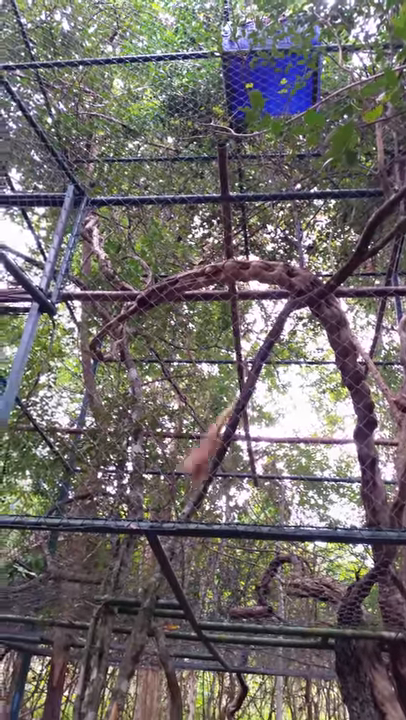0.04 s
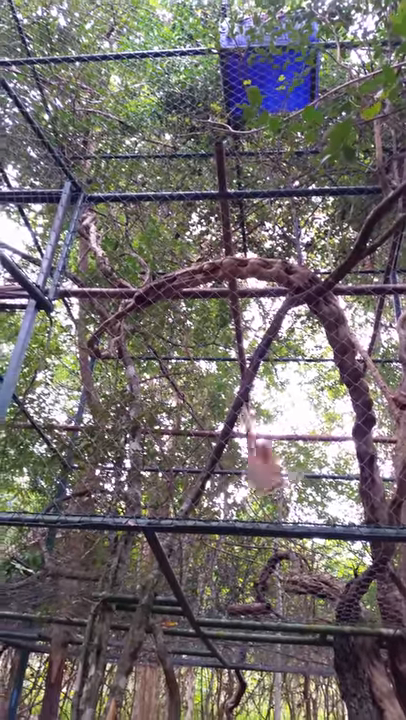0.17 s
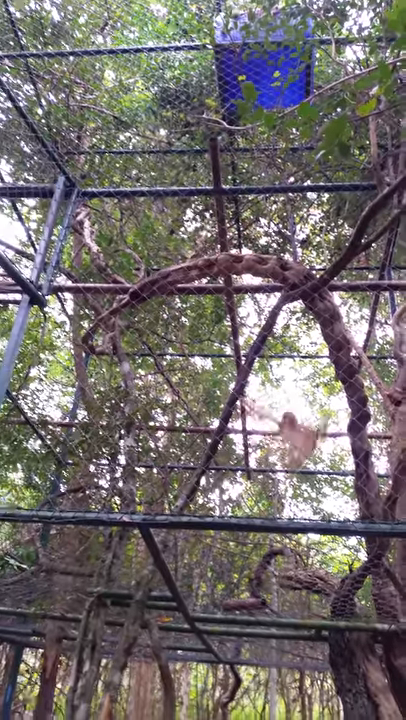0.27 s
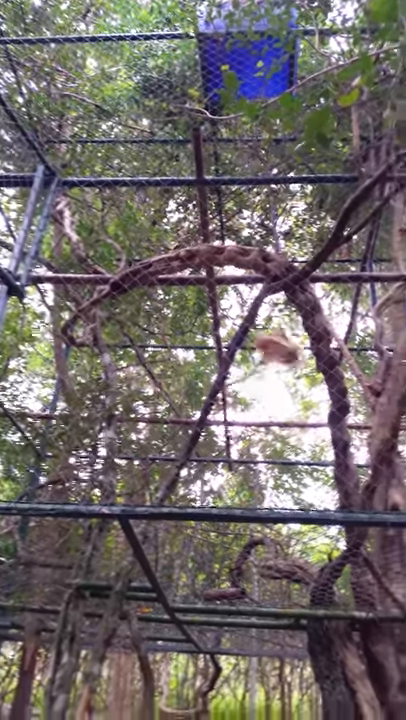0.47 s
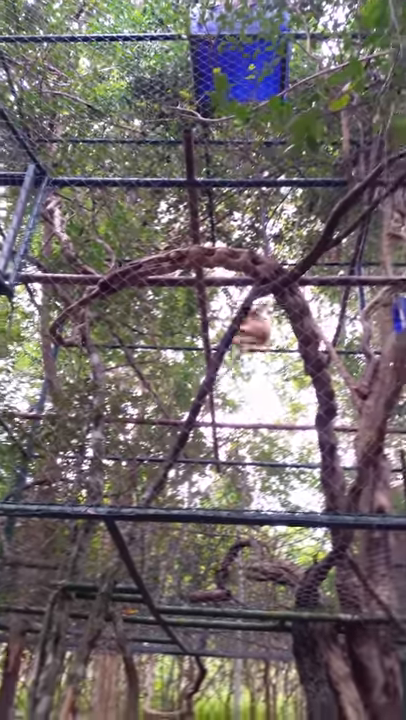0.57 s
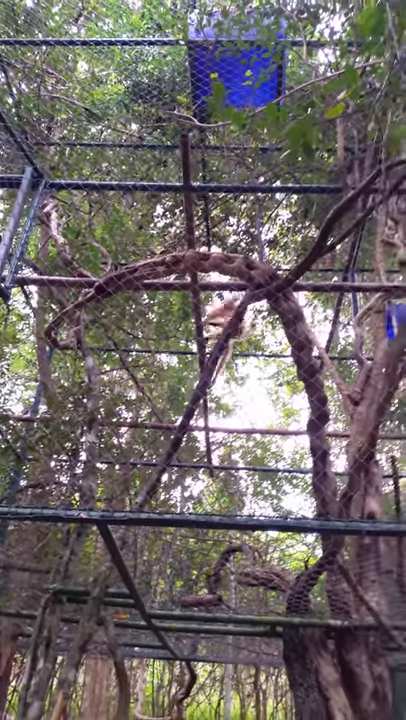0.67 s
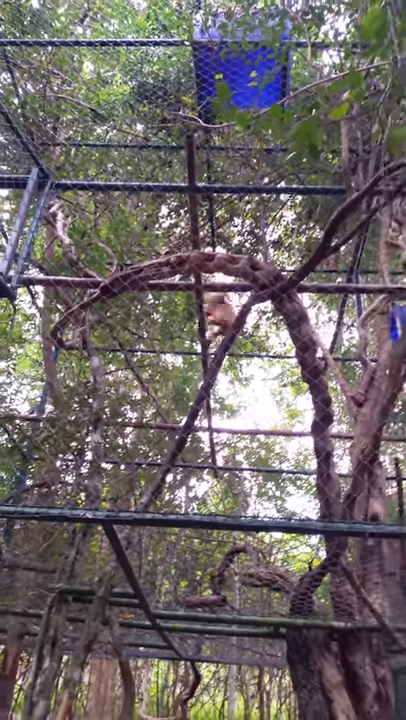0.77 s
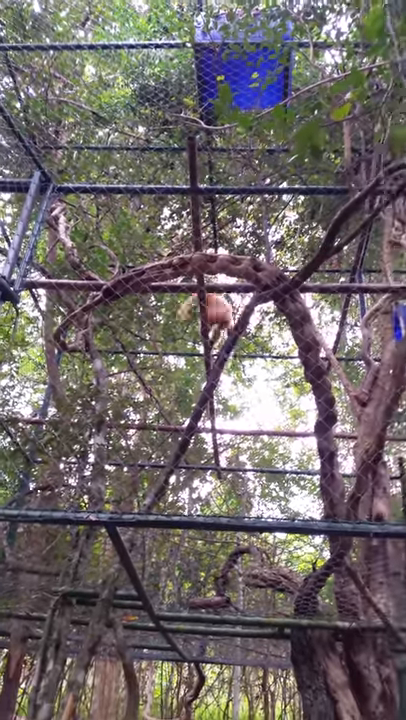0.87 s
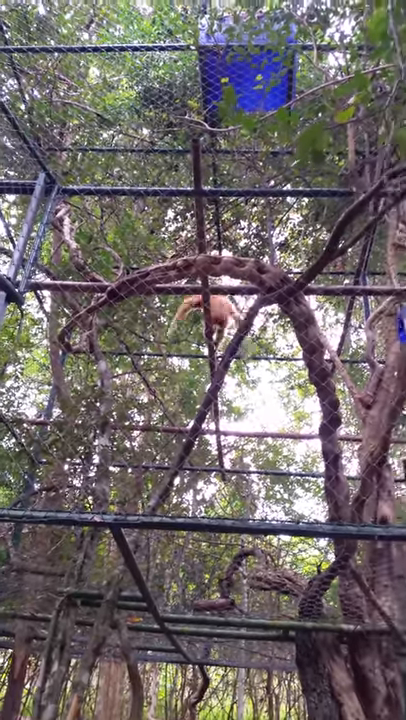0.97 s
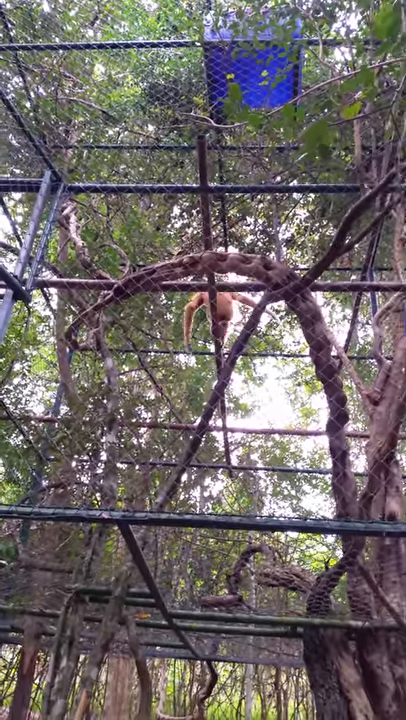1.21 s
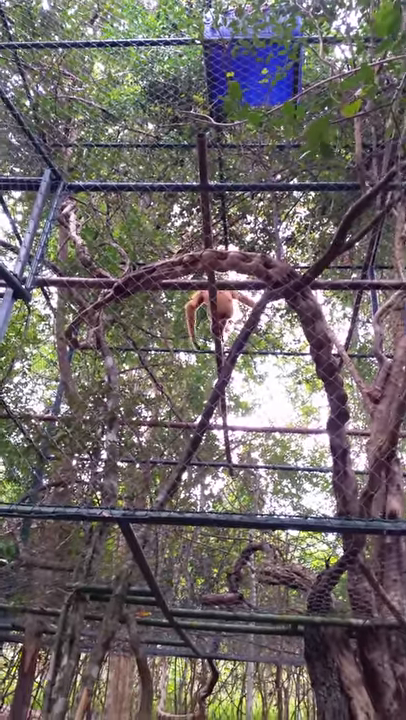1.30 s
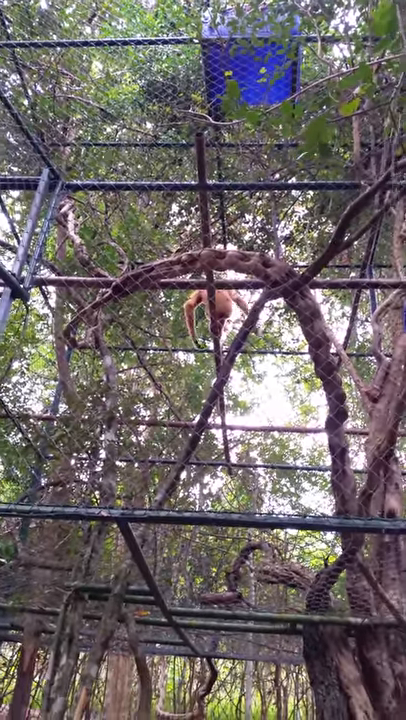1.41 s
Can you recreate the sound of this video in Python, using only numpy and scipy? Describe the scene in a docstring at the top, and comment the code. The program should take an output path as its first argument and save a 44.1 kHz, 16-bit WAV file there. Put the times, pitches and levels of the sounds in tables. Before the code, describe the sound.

A gibbon whoops in a large outdoor cage, heard from the right. The echo of an earlier call fades, then three loud whoops come at about 0.2, 0.6 and 1.1 seconds, each sweeping steeply up and breaking into a thin squeak. Soft falling grunts sound near 0.35 and 0.65 seconds. Faint branch rustling, brief hisses and dull bumps fall in between, over a low distant rumble.

```python
"""A gibbon swings through a large outdoor cage. An earlier whoop dies away over a distant rumble.
At 0.18 s the first whoop, a nearly pure tone, sweeps up two octaves and breaks into a thin squeak;
a soft falling grunt and rustling branches lie underneath. The second whoop follows at 0.63 s with
another grunt, the third at 1.06 s. Brief hisses and dull bumps fall in between.
Near surfaces and the enclosure throw the calls back."""
import sys
import numpy as np
from scipy import signal
from scipy.fft import rfft, irfft
from scipy.io import wavfile
from scipy.ndimage import uniform_filter1d, minimum_filter1d

SR = 44100
rng = np.random.default_rng(int(sys.argv[2]) if len(sys.argv) > 2 else 0)


def materialize(psi):
    """Save the field psi as 16-bit PCM at rate SR to the path in sys.argv[1].

    A 1-D psi becomes a single channel; in a 2-D psi each row is a channel.
    """
    bounded = np.clip(np.atleast_2d(psi).T, -1, 1)
    quanta = np.round(bounded * 32767).astype(np.int16)
    wavfile.write(sys.argv[1], SR, quanta)


N = 63945
LEAD = SR // 2  # samples before time zero
BAND_LIMIT_HZ = 14750


def amp(db):
    """Decibels to gain."""
    return 10 ** (np.asarray(db) / 20)


def unit(x):
    """Scales to rms 1."""
    return x / np.sqrt(np.mean(x ** 2) + 1e-20)


def read(points, hz):
    """Interpolates a table on a log-frequency axis."""
    points_hz, value = np.transpose(points)
    return np.interp(np.log(hz + 1), np.log(points_hz + 1), value)


def add(mix, start_s, sound):
    """Mixes a sound in at start_s."""
    part = mix[LEAD + round(start_s * SR):][:len(sound)]
    part += sound[:len(part)]


def noise(size, gain):
    """Unit-rms noise shaped by the function gain(Hz)."""
    spectrum = rfft(rng.standard_normal(size)) * gain(np.fft.rfftfreq(size, 1 / SR))
    return unit(irfft(spectrum, size))


def coloured(size, points):
    """Unit-rms noise from a table. Each row: frequency in Hz, relative level in dB."""
    return noise(size, lambda f: amp(read(points, f)))


def waver(size, rate_hz):
    """Random unsteadiness around a rate."""
    return noise(size, lambda f: f / rate_hz / (1 + (f / rate_hz) ** 3))


def arch(length_s):
    """Half-sine swell and fade."""
    return np.sin(np.linspace(0, np.pi, max(round(length_s * SR), 64)))


def follow(curve, attack_s=0.0022, release_s=0.0035):
    """A curve's soft-edged gate, then its value columns, per sample."""
    times, *columns = np.transpose(curve)
    times = np.sort(times)
    t = times[0] + np.arange(max(int((times[-1] - times[0]) * SR), 64)) / SR
    gate = np.clip((t - t[0]) / attack_s, 0, 1) * np.clip((t[-1] - t) / release_s, 0, 1)
    return [np.sin(gate * np.pi / 2) ** 2] + [np.interp(t, times, c) for c in columns]


def phase_of(hz):
    """Running phase of a pitch curve."""
    return 2 * np.pi * np.cumsum(hz) / SR


def background(level_db=-54, side_gain=0.22):
    """Low distant rumble, nearly the same on both sides."""
    # Outdoor spectrum. Each row: frequency in Hz, relative level in dB.
    spectrum = [(20, -13), (40, -15), (65, 0.5), (90, -5), (130, -9.5), (220, -22), (450, -29.5),
                (1500, -14.5), (4000, -21.5), (6300, -32.5), (8000, -79), (14000, -64)]
    mid = coloured(N, spectrum)
    side = side_gain * coloured(N, spectrum)
    return amp(level_db) * np.array([mid + side, mid - side])


def rustle(length_s, db):
    """A dull swell of swaying branches."""
    # Branch noise. Each row: frequency in Hz, relative level in dB.
    spectrum = [(60, -25), (160, -1), (260, -2.5), (450, -1.5), (700, 0.5), (1500, -49), (5000, -35),
                (14000, -38)]
    swell = arch(length_s)
    return amp(db) * swell * coloured(len(swell), spectrum)


def bump(length_s, hz, db):
    """A soft, dull knock: one swell of a low sine."""
    swell = arch(length_s)
    return amp(db) * swell * np.sin(phase_of(np.full(len(swell), hz)))


def hiss(length_s, centre_hz, width_hz, db):
    """A brief band of noise in the high treble."""
    swell = arch(length_s)
    band = noise(len(swell), lambda f: 1 / (1 + (2 * (f - centre_hz) / width_hz) ** 2))
    return amp(db) * swell * band


def grunt(length_s, start_hz, end_hz, db, jitter=0.06):
    """A soft, slightly rough falling tone."""
    swell = arch(length_s)
    hz = np.geomspace(start_hz, end_hz, len(swell)) * (1 + jitter * waver(len(swell), rate_hz=150))
    return amp(db) * swell * np.sin(phase_of(hz))


def squeak(curve, jitter=0.019, blur_hz=1300):
    """The voice breaks into a thin whistle, partly blurred into noise."""
    gate, hz, db, rough = follow(curve)
    rough = np.clip(rough, 0, 1)
    phase = phase_of(hz * (1 + jitter * waver(len(hz), rate_hz=700)))
    soft_db = 0.6 * np.minimum(db + 24, 0)  # overtones recede below -24 dB
    tone = 0
    for k, level_db in enumerate([0, -19 + soft_db, -35.5 + soft_db], 1):
        blur = noise(len(hz), lambda f: 1 / (1 + (f / blur_hz) ** 4))
        partial = np.sqrt(1 - rough ** 2) * np.sin(k * phase) + rough * blur * np.cos(k * phase)
        tone += amp(level_db) * (k * hz < BAND_LIMIT_HZ) * partial
    return gate * amp(db) * tone


def whoop(curve, air_db, blur_rad, jitter=0.005, fade_in_s=0.0061):
    """A rising tone whose blurred overtones sweep through the throat resonances, with a little air."""
    # Throat and open mouth. Each row: frequency in Hz, gain in dB.
    throat = [(550, 1), (900, 1.5), (1400, 3), (1900, 4.5), (2300, 6.5), (2800, -2), (3700, -8), (4700, -2),
              (5600, -2.5), (6600, -8), (7800, -17.5), (10000, -19), (12200, -28.5), (14500, -34)]
    # Air noise in the voice. Each row: frequency in Hz, relative level in dB.
    breath = [(450, -48.5), (900, -14), (2200, -19), (4500, 14), (6300, -4.5), (8000, -20), (11000, -23),
              (12500, -9), (14500, -19)]
    # Brief level dips. Each row: time in seconds, half width in seconds, depth in dB.
    dips = [(0.219, 0.0027, -0.5), (.281, 0.002, -8), (0.312, 0.0034, -21), (0.672, 0.0028, -10.5),
            (.699, 0.0037, -12), (0.722, 0.0012, -22), (0.735, 0.005, -8), (1.1, 0.0045, -10),
            (1.128, 0.0073, -5), (1.157, 0.0032, -8)]
    gate, hz, db, second_db, higher_db = follow(curve)
    size = len(hz)
    t = curve[0][0] + np.arange(size) / SR
    flutter_db = hz / 1900 * waver(size, rate_hz=102)  # grows with pitch: 1 dB rms at 1900 Hz
    dip_db = sum(depth_db * np.exp(-((t - at_s) / width_s) ** 2) for at_s, width_s, depth_db in dips)
    phase = phase_of(hz * (1 + jitter * waver(size, rate_hz=296)))
    slope_db = -1 + 0.85 * higher_db  # per harmonic; softer overtones fall off faster
    harmonics_db = [0, second_db, higher_db - 10]
    harmonics_db += [higher_db + slope_db * (k - 3.83) for k in range(4, 10)]
    tone = 0
    for k, level_db in enumerate(harmonics_db, 1):
        blur = blur_rad * (k - 1) * waver(size, rate_hz=666)
        gain = amp(read(throat, k * hz) + level_db) * (k * hz < BAND_LIMIT_HZ)
        tone += gain * np.sin(k * phase + blur)
    air = amp(air_db + 0.2 * higher_db) * coloured(size, breath)
    gate = gate * np.minimum((t - t[0]) / fade_in_s, 1)
    return gate * amp(db + flutter_db + dip_db) * (tone + air)


def diffuse_tail(early_db=11.5, early_s=0.073, build_s=0.0063):
    """Stereo reverberation of the cage; nearby bars and foliage scatter more at first."""
    # Decay. Each row: frequency in Hz, T60 in seconds.
    t60 = [(300, .5), (1000, 1.17), (2000, 0.84), (4500, 0.68), (8000, .5), (14000, 0.65)]
    # Tail spectrum. Each row: frequency in Hz, gain in dB.
    colour = [(250, -15), (650, -31), (900, -1.5), (1400, 0.5), (2100, 2), (3000, 2.5), (5000, 6),
              (8000, 10.5), (14000, 13)]
    # Left-right likeness. Each row: frequency in Hz, correlation from 0 to 1.
    likeness = [(700, 0.58), (1500, 0.2), (3000, 0.12), (8000, 0.075)]
    hz, t, (apart, right) = signal.stft(rng.standard_normal((2, SR)), SR, nperseg=256)
    hz = hz[:, None]
    same = np.clip(read(likeness, hz), 0, 1)
    left = same * right + np.sqrt(1 - same ** 2) * apart
    decay = amp(-60 * t / read(t60, hz) + early_db * np.exp(-t / early_s))
    decay /= np.sqrt((decay ** 2).mean(1, keepdims=True) * SR)  # equal energy per band
    tail = signal.istft(np.array([left, right]) * decay * amp(read(colour, hz)), SR, nperseg=256)[1]
    return tail * np.minimum(np.arange(tail.shape[1]) / SR / build_s, 1) ** 2


def enclosure(calls, direct_db=(-14.5, 0.5), tail_db=(-18, -7)):
    """Direct sound from the right, near echoes that beat against the sweeps, and a diffuse tail."""
    # Near surfaces. Each row: delay in ms, left gain, right gain.
    echoes = [(2.686, 0.06, .16), (6.183, -0.19, 0.42), (10.4, 0.044, 0.27), (16.42, 0.038, -0.14),
              (27.12, -0.054, 0.061)]
    # Extra colour on the left. Each row: frequency in Hz, gain in dB.
    left_colour = [(300, 4), (800, 4), (1200, 3.5), (2000, -3), (3000, -3), (4500, -0.5), (8000, -11),
                   (12000, 15.5)]
    response = diffuse_tail() * amp(tail_db)[:, None]
    response[:, 0] += amp(direct_db)
    for delay_ms, *gains in echoes:
        response[:, round(delay_ms * SR / 1000)] += gains
    left, right = signal.fftconvolve(calls[None], response, axes=1)[:, :2 * SR]
    hz = np.fft.rfftfreq(len(left), 1 / SR)
    left = irfft(rfft(left) * amp(read(left_colour, hz)), len(left))
    return np.array([left, right])[:, LEAD:LEAD + N]


def scene(earlier_s=0.44, low_cut_hz=491, low_left_db=-3.5):
    """Calls and hisses in the enclosure; soft low sounds dry, near the centre."""
    # Swaying branches. Each row: start in seconds, length in seconds, level in dB.
    rustles = [(.375, 0.071, -44.5), (0.428, 0.12, -51), (0.511, 0.053, -50), (0.679, 0.11, -55),
               (0, 0.43, -60.5), (1.056, 0.23, -90)]
    # Dull knocks. Each row: start and length in seconds, pitch in Hz, level in dB.
    bumps = [(.385, 0.033, 444, -44.5), (.925, 0.036, 196, -58), (1.275, 0.039, 169.8, -54)]
    # High hisses; the narrow band near 13.45 kHz rides on the third overtone of a squeak. Each row: start and
    # length in seconds, centre and width in Hz, level in dB.
    hisses = [(0.135, 0.049, 9780, 1100, -43), (0.166, 0.042, 10300, 600, -42),
              (0.157, 0.028, 7710, 3700, -41), (0.41, 0.022, 7800, 2900, -43),
              (0.814, 0.053, 13450, 344, -62.5), (1.319, 0.046, 5400, 400, -48)]
    # Low grunts. Each row: start and length in seconds, first and last pitch in Hz, level in dB.
    grunts = [(0.342, 0.055, 443, 203, -40), (0.645, 0.028, 440, 213, -34.5)]
    # One curve per squeak. Each row: time in seconds, pitch in Hz, level in dB, roughness from 0 to 1.
    squeaks = [
        [(.35, 2860, -14.5, 0.36), (.364, 3652, -17.5, 0), (.376, 4603, -19.5, 0.2), (.387, 4714, -28.5, .3)],
        [(.381, 3955, -17.5, .4), (.4, 4186, -31.5, 0), (.418, 4566, -23.5, .3), (.44, 4460, -58, .5)],
        [(.44, 5040, -36, 0.8), (.447, 5090, -31, .6), (.456, 5150, -43, .6)],
        [(.773, 3493, -31.5, 0.8), (.797, 4570, -29, 0.8), (.822, 5470, -34, .6)],
        [(.813, 4400, -32, 0.4), (.845, 4500, -33.5, 0.42), (.868, 4453, -39.5, 0.3), (.99, 4466, -67, 0.24)],
        [(1.172, 2758, -20.5, 0.53), (1.186, 2870, -25, 0.08), (1.202, 3276, -23.5, 0.77)],
        [(1.215, 5050, -40, 0.6), (1.24, 5280, -39, 0.8), (1.285, 6720, -46.5, 0), (1.41, 6430, -66.5, 0.2)],
    ]
    # One curve per whoop, ahead of the throat. Each row: time in seconds, pitch in Hz, level in dB,
    # second harmonic and base level of higher overtones in dB relative to the fundamental.
    whoops = [
        [(.181, 568, -28, -7, -28), (.192, 695.4, -23.5, -19, -16), (.206, 818.8, -11.5, -19.5, -22),
         (.235, 916.6, -11, -3.5, -5), (.268, 1070, -17, 0.5, -3), (.298, 1496, -11, -4, -15.5),
         (.325, 1866, -13, 1, -4), (.351, 2281, -12.5, -18, -8)],
        [(.626, 558.6, -32, -20, -41), (.638, 697, -29.5, -10.5, -55), (.652, 776.5, -15, -21.5, -16.5),
         (.68, 930.7, -13, -1, -10.5), (.698, 1069, -16, 1.5, -7), (.72, 1397, -10.5, -9.5, -17),
         (.746, 1886, -12.5, -12.5, -12.5), (.766, 2280, -18.5, -17, -23)],
        [(1.056, 567.3, -37.5, -35, -19), (1.068, 721, -29.5, -5.5, -45), (1.084, 786, -17, -22, -19),
         (1.11, 904.4, -13, -7.5, -13), (1.128, 1080, -19.5, -0.5, -7), (1.148, 1324, -12, -14.5, -19.5),
         (1.165, 1630, -14.5, -16, -31.5), (1.18, 2034, -16.5, -17, -39)],
    ]
    # Hoarseness per whoop. Each row: base air level in dB, phase blur per overtone in radians.
    hoarseness = [(-30, .04), (-28, .11), (-28, .13)]
    calls, low = np.zeros((2, LEAD + N))
    # A call like the first ends before time zero; only its reverberation is heard.
    add(calls, whoops[0][0][0] - earlier_s, amp(2) * whoop(whoops[0], *hoarseness[0]))
    add(calls, squeaks[0][0][0] - earlier_s, amp(-12) * squeak(squeaks[0]))
    for curve, (air_db, blur_rad) in zip(whoops, hoarseness):
        add(calls, curve[0][0], whoop(curve, air_db, blur_rad))
    for curve in squeaks:
        add(calls, curve[0][0], squeak(curve))
    for start_s, *row in hisses:
        add(calls, start_s, hiss(*row))
    for source, rows in (grunt, grunts), (bump, bumps), (rustle, rustles):
        for start_s, *row in rows:
            add(low, start_s, source(*row))
    calls = signal.sosfilt(signal.butter(6, low_cut_hz, "high", fs=SR, output="sos"), calls)
    return enclosure(calls) + (low[LEAD:] + background()) * amp([[low_left_db], [0]])


def record(dry, ceiling=0.9):
    """Smooth peak limiter, then the band limit."""
    needed = ceiling / np.maximum(abs(dry).max(0), ceiling)
    gain = uniform_filter1d(minimum_filter1d(needed, size=401), size=201)
    lowpass = signal.firwin(511, BAND_LIMIT_HZ, window=("kaiser", 9), fs=SR)
    return signal.oaconvolve(dry * gain, lowpass[None], "same")


dry = scene()
out = record(dry)
materialize(out)
```